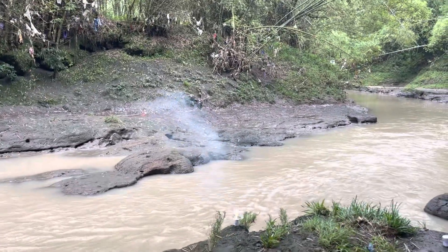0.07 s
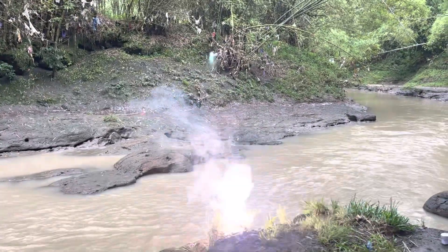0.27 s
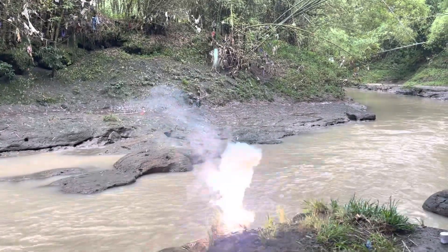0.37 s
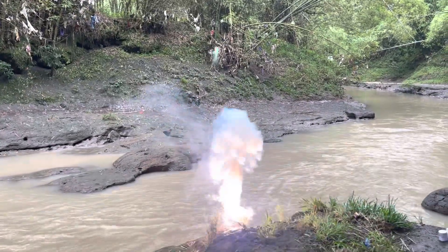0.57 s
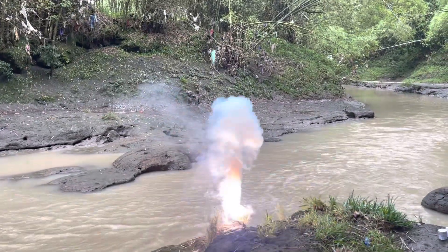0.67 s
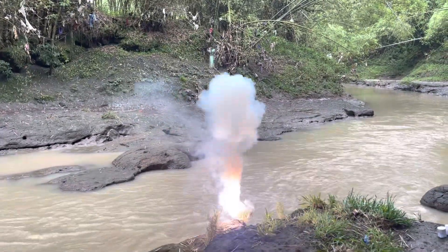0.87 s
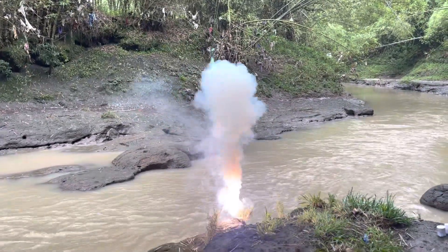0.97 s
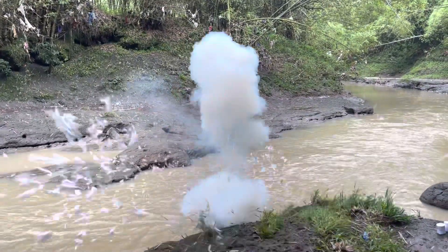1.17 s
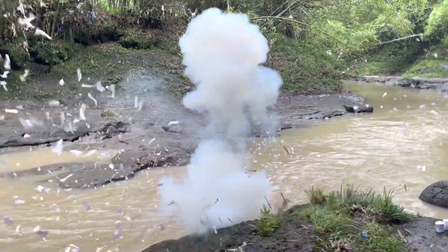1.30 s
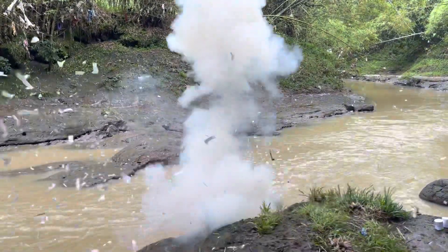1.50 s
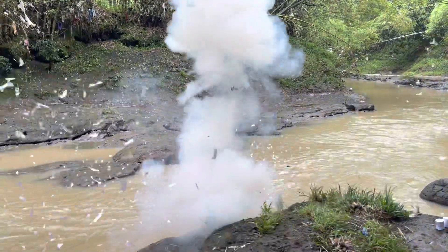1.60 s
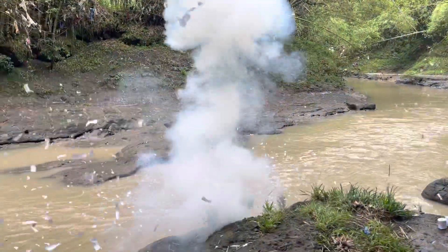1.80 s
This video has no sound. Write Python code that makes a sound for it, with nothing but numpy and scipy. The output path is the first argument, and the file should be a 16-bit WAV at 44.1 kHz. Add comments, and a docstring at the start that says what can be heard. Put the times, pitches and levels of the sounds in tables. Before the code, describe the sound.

Homemade firecracker outdoors: short fuse sputter, one hard crack, faint rushing jet, then a big echoing bang

```python
"""A river murmurs, then the fuse of a paper firecracker spits and fizzes until a first charge cracks.
A jet of flame rushes over a low roll, then the main charge bursts and echoes return from banks and trees.
Shock fronts are pressure pulses; fizz, jet, rolls and river are coloured noise, some with random clicks.
A small stereo recorder smears the shocks, rounds the peaks and thins the bass.
The treble drops steeply near 13 kHz."""
import sys
import numpy as np
from scipy import signal
from scipy.fft import rfft, irfft
from scipy.io import wavfile

SR = 44100
rng = np.random.default_rng(int(sys.argv[2]) if len(sys.argv) > 2 else 0)


def generate_wav(signal):
    """Clip the signal to [-1, 1] and save it as 16-bit WAV at the path in sys.argv[1]."""
    frames = np.transpose(np.atleast_2d(signal))
    scaled = np.clip(frames, -1, 1) * 32767
    pcm = np.round(scaled).astype(np.int16)
    wavfile.write(sys.argv[1], SR, pcm)


N = 81585

# Shock fronts, levels before filtering: start_s, level_db, push_s, left_minus_right_db, right_lag_s, snap_db
SHOCK_FRONTS = [(0.2213, 5.6, .0019, 1, .00002, 10), (1.1434, -1.5, .0019, -1, .0002, 16)]
# Narrow noise swelling into each bang: swell_s, level_db, left_minus_right_db
BANG_SWELLS = [(0.0062, -28.5, -15.5), (0.0075, -12, -7)]
# Resonances of that noise: centre_hz, width_hz, level_db
SWELL_BANDS = [(245, 70, 6), (2110, 140, 0), (2700, 900, 1), (4620, 70, -5), (7910, 100, -12)]
# Single echoes off the banks, levels before dulling: start_s, level_db, push_s, left_minus_right_db
BANK_ECHOES = [(0.257, -15, 0.00065, 3), (0.510, -25, 0.0044, 1), (1.148, -10.5, 0.013, 19),
               (1.157, -5.5, 0.0035, 13), (1.168, -22, 0.0087, -24), (1.188, -14, 0.00083, 35),
               (1.21, -5, 0.0013, -8), (1.235, 0.5, 0.00086, 2), (1.243, 2, 0.0012, 0),
               (1.263, -25, 0.0034, -3), (1.328, -6, 0.00039, 8), (1.530, -16.5, 0.0016, 2),
               (1.564, -15, 0.00069, 1), (1.598, -36, 0.0016, 1), (1.660, -20.5, 0.00079, 8),
               (1.681, -18.5, 0.0029, 0), (1.711, -23, 0.0081, -0.5), (1.724, -25.5, 0.0046, -2),
               (1.785, -28.5, 0.0036, -1)]
# Rolling echoes of the first bang: time_s, bass_db, middle_db
FIRST_ROLL = [(0.232, -55, -51), (0.252, -46, -32.5), (0.285, -41, -42), (0.36, -46, -41.5),
              (0.44, -42.5, -37), (0.52, -34.5, -34.5), (0.59, -41, -37.5), (0.77, -40.5, -44.5),
              (0.9, -37.5, -43.5), (1.143, -41, -48)]
# Rolling echoes of the main bang: time_s, rumble_db, treble_db
MAIN_ROLL = [(1.148, -15, -27), (1.166, -19, -26.5), (1.214, -24, -29), (1.248, -21.5, -26),
             (1.262, -26, -28.5), (1.374, -34.5, -35.5), (1.448, -34, -38.5), (1.472, -35.5, -37.5),
             (1.598, -29.5, -38), (1.632, -36, -39.5), (1.73, -38.5, -47.5), (1.754, -37.5, -50.5),
             (1.794, -41, -51.5), (1.818, -41.5, -56), (1.85, -42, -63)]
# Colour of the first roll: pitch_hz, relative_level_db
ROAR_COLOUR = [(30, -36), (50, -4.5), (90, -4.5), (135, 1), (200, -6), (270, -7.5), (480, -5.5),
               (800, -8.5), (1300, -13.5), (2200, -23), (15000, -37)]
# Colour of the main rumble: pitch_hz, relative_level_db
RUMBLE_COLOUR = [(30, -57), (50, -16), (90, -1), (150, 1.5), (270, -5), (480, -6), (800, -8.5), (1700, -16),
                 (4000, -25), (15000, -34)]
# Colour of treble scattered off leaves: pitch_hz, relative_level_db
LEAF_COLOUR = [(300, -32), (1000, 4), (2000, -5.5), (3500, -5.5), (6000, -6.5), (8500, 0), (9700, 3.5),
               (10900, 4), (12000, -9), (15000, -6)]
# Loudness of the flame jet: time_s, level_db
JET_LEVEL = [(0.222, -38), (0.24, -57), (0.255, -60), (0.285, -56), (0.42, -51), (0.5, -44), (0.6, -43.5),
             (0.85, -44.5), (1.143, -44)]
# Colour of the flame jet: pitch_hz, relative_level_db
FLAME_COLOUR = [(200, -60), (800, 8.5), (1500, -9.5), (2400, -5), (4800, 3), (7000, -5), (8500, -2),
                (9700, 3.5), (10900, 1), (12000, -11), (15000, -18)]
# Loudness of the fizz as the fuse burns faster: time_s, level_db
FIZZ_LEVEL = [(0.066, -47), (0.070, -26.5), (0.105, -36.5), (0.13, -29), (0.19, -26.5), (0.2215, -18.5)]
# Colour of the fizz: pitch_hz, relative_level_db
FUSE_COLOUR = [(40, -12), (200, -6.5), (700, -10), (1900, -14), (2500, -18), (4000, -8.5), (6600, -19.5),
               (8500, -10.5), (9700, -2), (10900, -1.5), (12000, -13), (15000, 0)]
# Spits of the fuse, levels before the shared trim: peak_s, level_db, decay_s
FUSE_SPITS = [(0.076, -34, 0.001), (0.089, -22, 0.0019), (0.0945, -15, 0.0022), (0.163, -29, 0.0038),
              (0.176, -20, 0.0018), (0.189, -24.5, 0.0039)]
# Colour of spits and torn-case rasp: pitch_hz, relative_level_db
SPIT_COLOUR = [(60, -5), (200, 1), (900, 4), (2000, -15.5), (4000, -5), (8000, -10.5), (12000, -2),
               (15000, -3.5)]
# Colour of the river: pitch_hz, relative_level_db
RIVER_COLOUR = [(24, -36), (40, -25), (103, 3), (257, -23.5), (627, -12), (2220, -25.5), (3740, -28),
                (8270, -20), (15000, -59)]
# Left-right likeness, before each source's scatter exponent: pitch_hz, likeness (0 to 1)
STEREO_LIKENESS = [(60, 0.99), (130, 1), (290, 0.94), (640, 0.3), (1400, 0.15), (2100, 0.53), (3100, 0.57),
                   (5000, 0.76), (7000, 0.65), (10000, 1), (15000, 0.33)]
# Stereo balance: pitch_hz, left_minus_right_db
STEREO_LEAN = [(60, -1), (150, 0.5), (380, 1.5), (950, 2), (2380, 2), (5980, 2), (15000, -1)]
# Phase between the microphone ports: pitch_hz, left_lead_rad
PORT_PHASE = [(0, 0), (1800, -.4), (2600, .6), (4200, .65), (6200, 0), (7600, .5), (8300, .1), (8950, -1),
              (9650, -2.4), (10300, -3.15), (11000, -3.9), (11700, -5.4), (12400, -6.2), (16000, -6.3)]

FRONT_CUT_HZ, CRACK_HZ = 2900, 10200  # body of the front below, snap above
SUCTION = 1.29  # depth of the pull after the push
DEBRIS_DB, DEBRIS_S = -28, 0.0053  # rasp of torn paper and grit: level relative to its bang, decay
SLAP_CUT_HZ = 380
ECHOES_PER_S, ECHO_SPREAD_DB, ECHO_SHARE = 400, 1, 0.48
BASS_TOP_HZ = 266
FADING_TOP_HZ, TOP_FADE_DB_PER_S = 10200, 40
CRACKLES_PER_S, CRACKLE_SPREAD_DB, CRACKLE_SHARE = 2500, 3.0, .3
SPIT_TRIM_DB = -4.5
PIP_S, PIP_DB, PIP_DECAY_S, PIP_HZ = 0.153, -29.5, 0.0034, 1920
RIVER_DB = -59
BASS_CUT_HZ, SMEAR_HZ = 83, 274
TOP = .9  # ceiling before the treble filters
TREBLE_EDGE_HZ, ABOVE_EDGE_DB, CUTOFF_HZ = 12850, -30, 16400

TIME_S = np.arange(N) / SR
LEFT_RIGHT = np.array([[1], [-1]])


def amp(db):
    """Turn dB into gain."""
    return 10 ** (np.asarray(db) / 20)


def rms_one(x):
    """Scale to rms 1."""
    return x / np.sqrt(np.mean(x ** 2) + 1e-20)


def level(rows, axis=1):
    """Draw a gain curve from a dB column, at -120 dB outside the table's span."""
    rows = np.array(rows)
    return amp(np.interp(TIME_S, rows[:, 0], rows[:, axis], left=-120, right=-120))


def at_hz(points, hz):
    """Read a table on a log-frequency axis."""
    points = np.array(points)
    return np.interp(np.log(hz + 1), np.log(points[:, 0] + 1), points[:, 1])


def filtered(x, order, cut_hz, kind="low"):
    """Run a Butterworth filter forward in time."""
    return signal.sosfilt(signal.butter(order, cut_hz, kind, fs=SR, output="sos"), x)


def below_hz(x, order, cut_hz):
    """Keep the lows without shifting them in time, by filtering both ways."""
    return signal.sosfiltfilt(signal.butter(order, cut_hz, fs=SR, output="sos"), x)


def drift(rate_hz):
    """Wander slowly at random with rms 1, drawn every 40 samples and joined by lines."""
    pole = np.exp(-80 * np.pi * rate_hz / SR)
    noise = rng.standard_normal(N // 40 + 2002)
    slow = signal.lfilter([1], [1, -2 * pole, pole * pole], noise)[2000:]  # skip the settling
    return np.interp(np.arange(N) / 40, np.arange(len(slow)), rms_one(slow))


def grains(per_s, spread_db, share):
    """Mix white noise with a power share of uneven random clicks."""
    share = np.clip(share, 0, 1)
    sizes = amp(spread_db * np.minimum(rng.exponential(1, (2, N)), 4))
    sizes = sizes * rng.choice([-1, 1], (2, N))
    clicks = rms_one(sizes * (rng.random((2, N)) < per_s / SR))
    return np.sqrt(share) * clicks + np.sqrt(1 - share) * rng.standard_normal((2, N))


def banded(source, spectrum, patchy_db, scatter=0.25):
    """Colour a noise pair in flickering half-octave bands, as two ports hear it; left-right mean has rms 1."""
    hz = np.fft.rfftfreq(N, 1 / SR)
    alike = np.clip(at_hz(STEREO_LIKENESS, hz), 0, 1) ** scatter
    mid, side = rfft(source) * amp(at_hz(spectrum, hz))
    balance = amp(at_hz(STEREO_LEAN, hz) / 2) ** LEFT_RIGHT.astype(float)
    phase = np.exp(.5j * at_hz(PORT_PHASE, hz) * LEFT_RIGHT)
    pair = balance * phase * (np.sqrt(1 + alike) * mid + np.sqrt(1 - alike) * side * LEFT_RIGHT)

    place = 2 * np.log2(hz / 30 + 1e-9)  # half octaves above 30 Hz
    together = drift(6)
    out = 0
    for k in range(20):
        flicker = amp(patchy_db * (.7 * together + drift(15)))
        band = np.clip(1 - abs(place - k), 0, 1)
        out = out + flicker * irfft(pair * band, N)
    return out / np.sqrt(np.mean(out.mean(axis=0) ** 2))


def shock(start_s, level_db, push_s):
    """Jump in pressure, decay through zero, then pull back in a slow suction."""
    t = TIME_S - start_s
    u = np.clip(t / push_s, 0, 30)
    rise = np.clip(t * SR + .5, 0, 1)
    return amp(level_db) * rise * (1 - SUCTION * u) * np.exp(-u)


def shock_pair(start_s, level_db, push_s, lean_db, right_lag_s):
    """Place a shock in stereo by level and right-hand lag."""
    left = shock(start_s, level_db + lean_db / 2, push_s)
    right = shock(start_s + right_lag_s, level_db - lean_db / 2, push_s)
    return np.array([left, right])


def bangs():
    """Fire direct pressure fronts with a bright snap, and let the torn case rasp and die after each."""
    fronts, snaps, dying = 0, 0, 0
    for start_s, level_db, push_s, lean_db, right_lag_s, snap_db in SHOCK_FRONTS:
        fronts = fronts + shock_pair(start_s, level_db, push_s, lean_db, right_lag_s)
        snaps = snaps + shock(start_s, snap_db, push_s)
        decay = np.exp(-abs(TIME_S - start_s) / DEBRIS_S)
        dying = dying + amp(level_db + DEBRIS_DB) * (TIME_S > start_s) * decay
    rasp = banded(grains(3800, 3.5, 0.8), SPIT_COLOUR, patchy_db=3, scatter=0.53)
    crack = filtered(snaps + 1e-18, 4, CRACK_HZ, "high")
    return filtered(fronts + 1e-18, 2, FRONT_CUT_HZ) + crack + dying * rasp


def lead_in():
    """Swell narrow bands of noise for some milliseconds up to each bang and stop with it."""
    hz = np.fft.rfftfreq(N, 1 / SR)
    shape = 0
    for centre_hz, width_hz, level_db in SWELL_BANDS:
        resonance = 1 / (1 + (2 * (hz - centre_hz) / width_hz) ** 2)
        shape = shape + amp(level_db) / np.sqrt(width_hz) * resonance
    shared, own = rng.standard_normal(N), rng.standard_normal((2, N))
    ring = rms_one(irfft(rfft(shared + 3.0 * own) * shape, N))
    swells = 0
    for (start_s, *_), (swell_s, level_db, lean_db) in zip(SHOCK_FRONTS, BANG_SWELLS):
        rise = (TIME_S < start_s) * np.exp(-.5 * ((TIME_S - start_s) / swell_s) ** 2)
        swells = swells + amp(level_db + lean_db * LEFT_RIGHT / 2) * rise
    return ring * swells


def slaps():
    """Return distinct echoes as softer shocks, dulled by earth and distance."""
    lags_s = rng.uniform(-0.00074, 0.00006, len(BANK_ECHOES))
    echoes = sum(shock_pair(*echo, lag_s) for echo, lag_s in zip(BANK_ECHOES, lags_s))
    return filtered(echoes + 1e-18, 2, SLAP_CUT_HZ)


def first_roll():
    """Blend countless small echoes into a lumpy rumble whose bass and middle move separately."""
    source = grains(ECHOES_PER_S, ECHO_SPREAD_DB, 0.22)
    roar = banded(source, ROAR_COLOUR, patchy_db=1.4, scatter=0.49)
    bass = below_hz(roar, 2, BASS_TOP_HZ)
    return level(FIRST_ROLL) * bass + level(FIRST_ROLL, axis=2) * (roar - bass)


def main_roll():
    """Roll a rumble and a leafy treble wash off the main bang; the echoes' top fades steadily after it."""
    source = grains(ECHOES_PER_S, ECHO_SPREAD_DB, ECHO_SHARE)
    rumble = banded(source, RUMBLE_COLOUR, patchy_db=0.0, scatter=2.1)
    wash = banded(grains(3500, 2.1, 0.15), LEAF_COLOUR, patchy_db=0.73, scatter=0.98)
    bang_s = SHOCK_FRONTS[1][0]
    rows = [(bang_s, *MAIN_ROLL[0][1:])] + list(MAIN_ROLL)  # hold the first levels back to the bang
    echoes = level(rows) * rumble + level(rows, axis=2) * wash
    below = below_hz(echoes, 8, FADING_TOP_HZ)
    top_fade = amp(-TOP_FADE_DB_PER_S * np.maximum(TIME_S - bang_s, 0))
    return below + (echoes - below) * top_fade


def jet():
    """Rush smooth, bright noise for the burning gas."""
    return level(JET_LEVEL) * banded(grains(4000, 2.1, 0.13), FLAME_COLOUR, patchy_db=1.4)


def fuse():
    """Crackle a fizz of noise and clicks, with short spits that swell and die within milliseconds."""
    puffs = 0
    for peak_s, level_db, decay_s in FUSE_SPITS:
        slope_s = np.where(TIME_S < peak_s, 0.52 * decay_s, decay_s)
        puffs = puffs + amp(level_db) * np.exp(-abs(TIME_S - peak_s) / slope_s)
    source = grains(CRACKLES_PER_S, CRACKLE_SPREAD_DB, CRACKLE_SHARE)
    fizz = banded(source, FUSE_COLOUR, patchy_db=2.0)
    spit = banded(rng.standard_normal((2, N)), SPIT_COLOUR, patchy_db=-0.5)
    return level(FIZZ_LEVEL) * fizz + amp(SPIT_TRIM_DB) * puffs * spit


def pip():
    """Whistle one fuse spit as a decaying sine with its octave."""
    t = np.maximum(TIME_S - PIP_S, 0)
    tone = np.sin(2 * np.pi * PIP_HZ * t)
    octave = 0.77 * np.sin(2 * 2 * np.pi * PIP_HZ * t)
    return amp(PIP_DB) * np.exp(-t / PIP_DECAY_S) * (tone + octave)


def river():
    """Murmur steadily in the background with coloured, flickering noise."""
    return amp(RIVER_DB) * banded(rng.standard_normal((2, N)), RIVER_COLOUR, patchy_db=-3.5)


def scene():
    """Layer the river, the blasts, the burning and the rolling echoes."""
    background = river()
    blasts = bangs() + lead_in() + slaps()
    burning = fuse() + pip() + jet()
    rolls = first_roll() + main_roll()
    return background + blasts + burning + rolls


def record(dry):
    """Invert, cut bass, smear shocks into falling sweeps by phase, round peaks; the treble drops steeply."""
    x = filtered(-dry, 1, BASS_CUT_HZ, "high")
    tangent = np.tan(np.pi * SMEAR_HZ / SR)
    c = (tangent - 1) / (tangent + 1)
    for _ in range(6):  # all-pass filters turn phase and leave each frequency's level alone
        x = signal.lfilter([c, 1], [1, c], x)
    x = x / (1 + (x / TOP) ** 6) ** (1 / 6)
    edge = signal.cheby2(12, 30, TREBLE_EDGE_HZ, fs=SR, output="sos")
    x = signal.sosfiltfilt(edge, x) + amp(ABOVE_EDGE_DB) * x  # a little treble stays above the edge
    return signal.sosfilt(signal.cheby2(12, 70, CUTOFF_HZ, fs=SR, output="sos"), x)


dry = scene()
out = record(dry)
generate_wav(out)
```